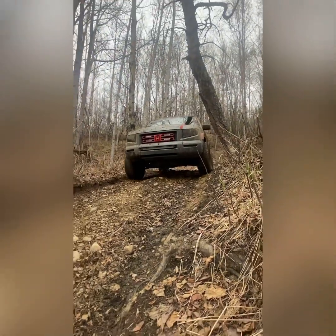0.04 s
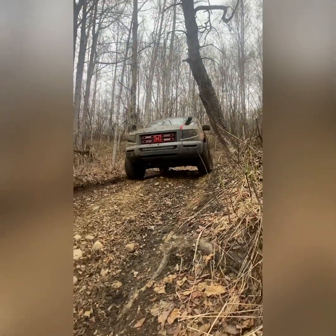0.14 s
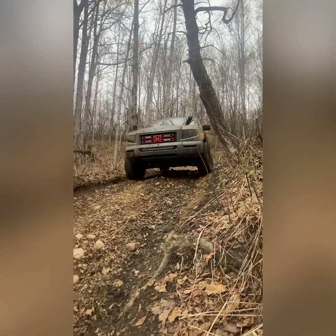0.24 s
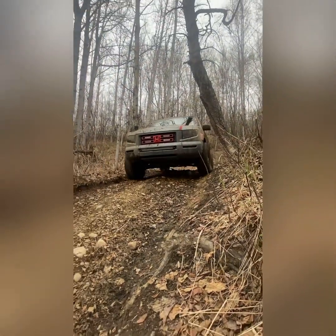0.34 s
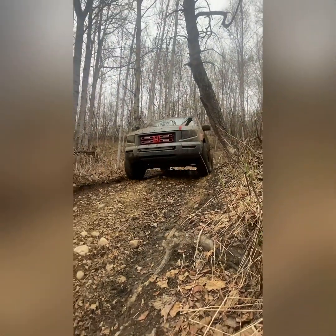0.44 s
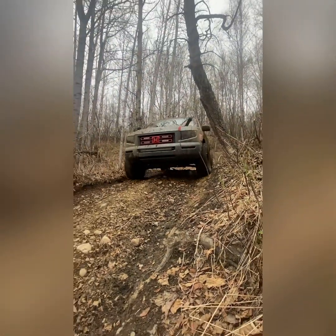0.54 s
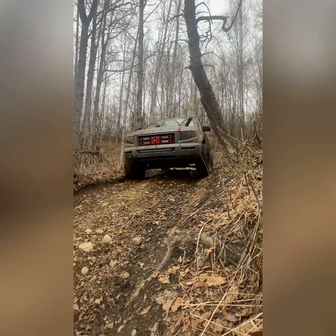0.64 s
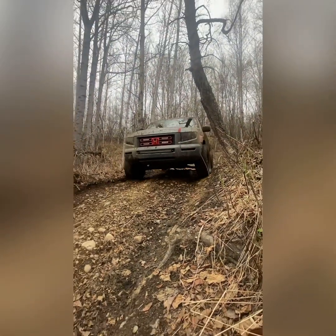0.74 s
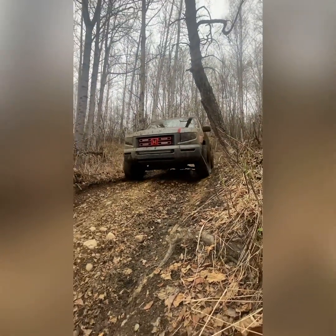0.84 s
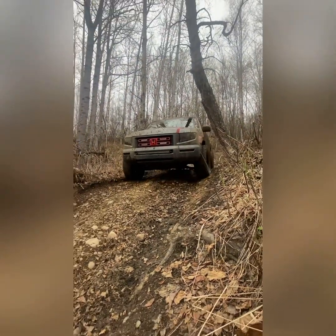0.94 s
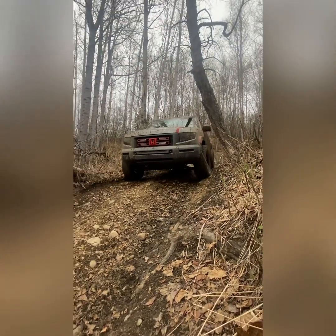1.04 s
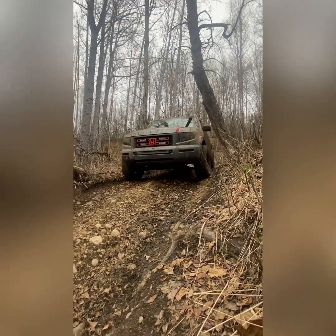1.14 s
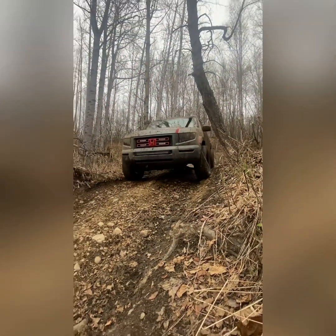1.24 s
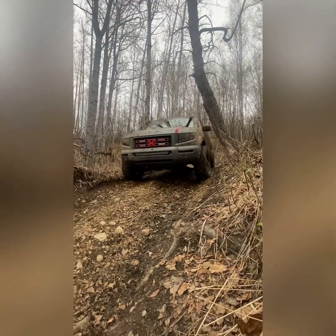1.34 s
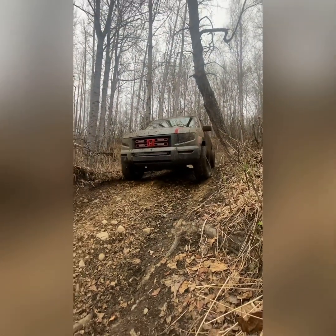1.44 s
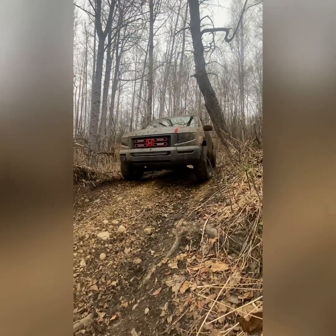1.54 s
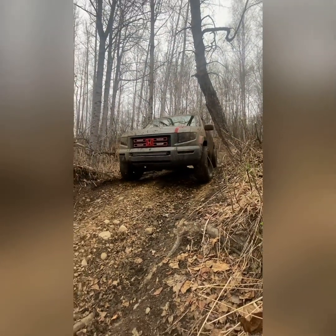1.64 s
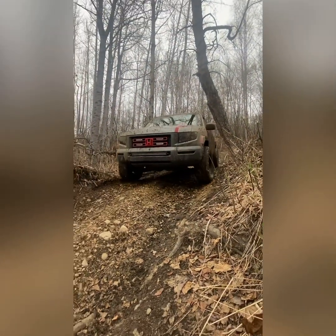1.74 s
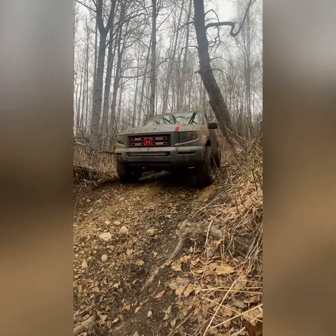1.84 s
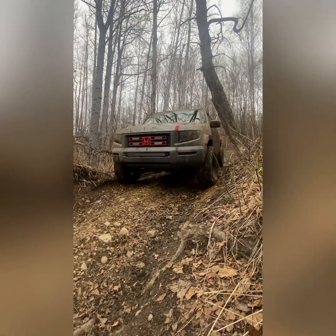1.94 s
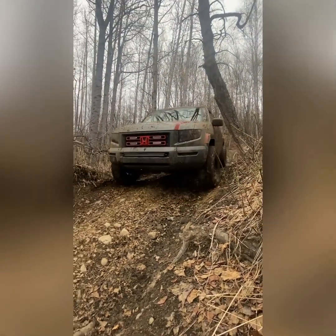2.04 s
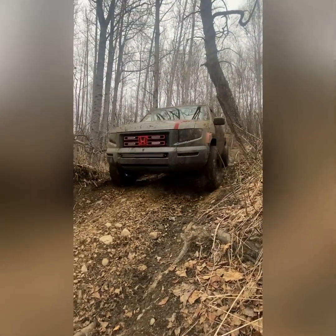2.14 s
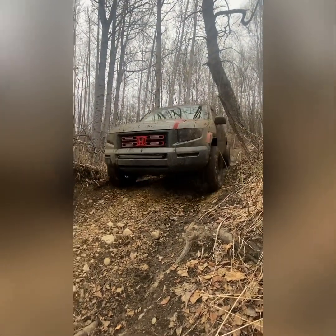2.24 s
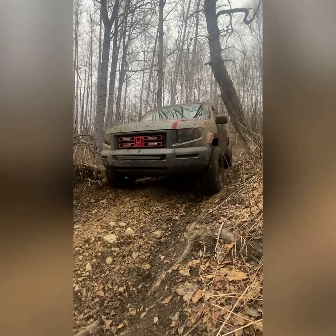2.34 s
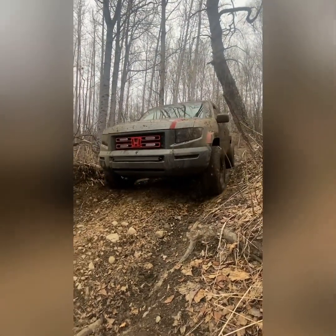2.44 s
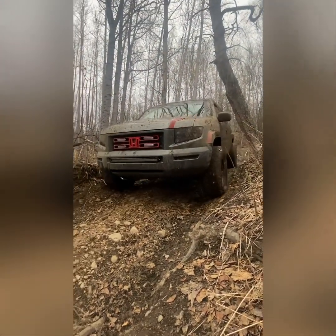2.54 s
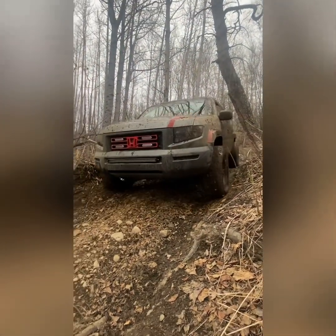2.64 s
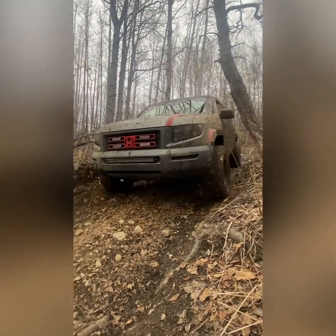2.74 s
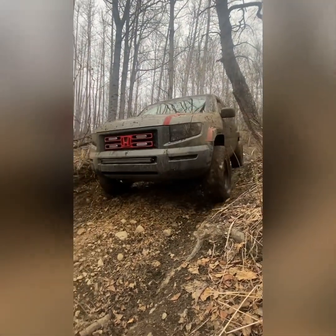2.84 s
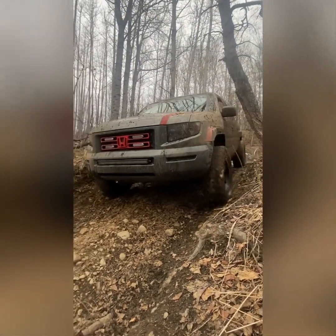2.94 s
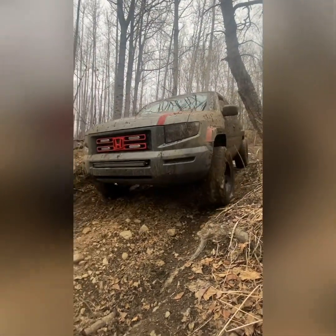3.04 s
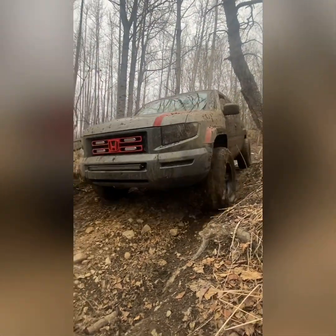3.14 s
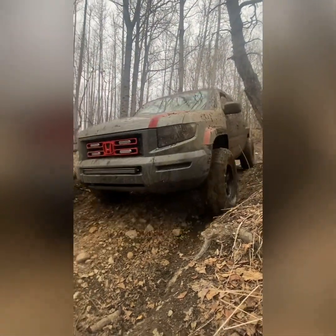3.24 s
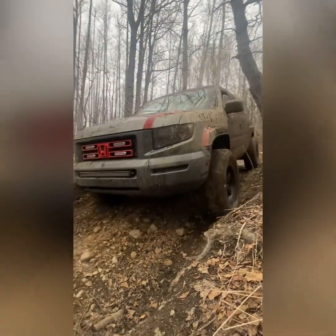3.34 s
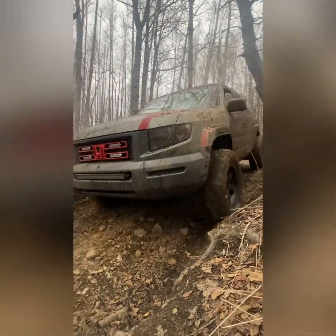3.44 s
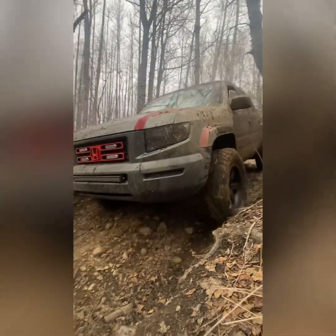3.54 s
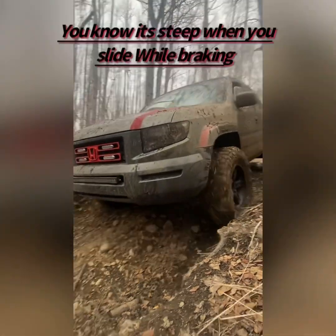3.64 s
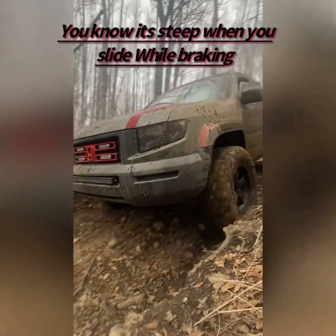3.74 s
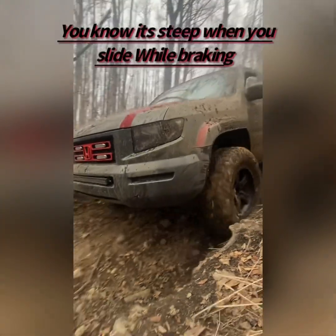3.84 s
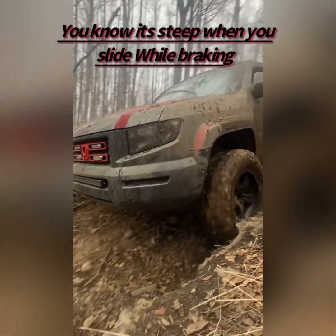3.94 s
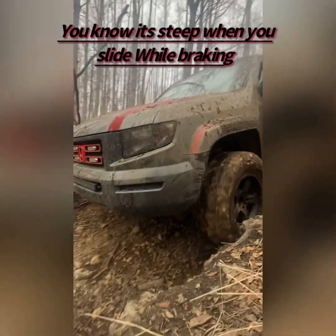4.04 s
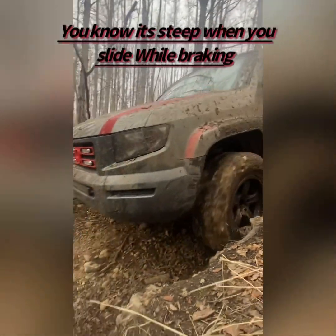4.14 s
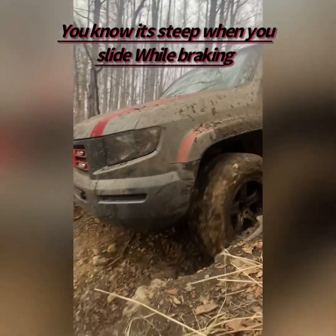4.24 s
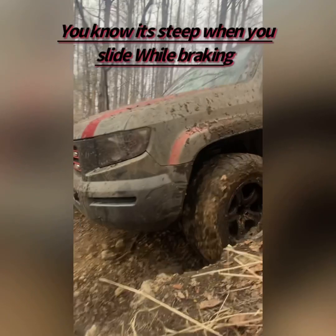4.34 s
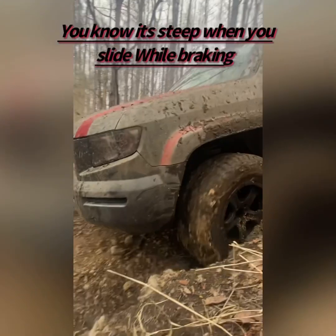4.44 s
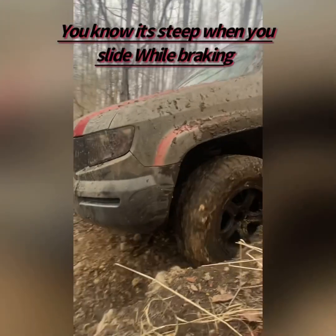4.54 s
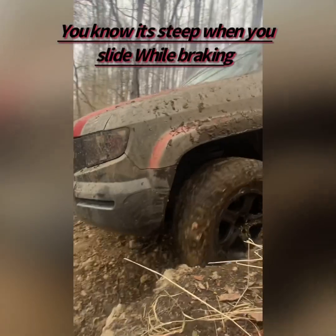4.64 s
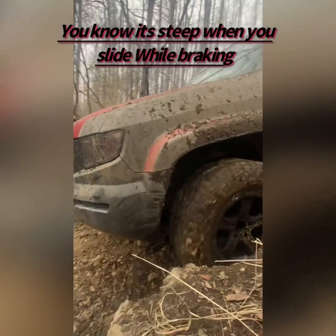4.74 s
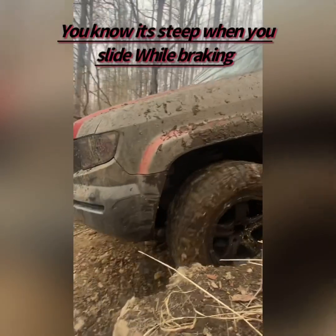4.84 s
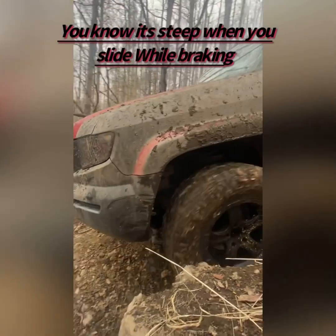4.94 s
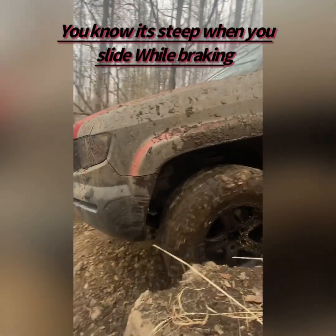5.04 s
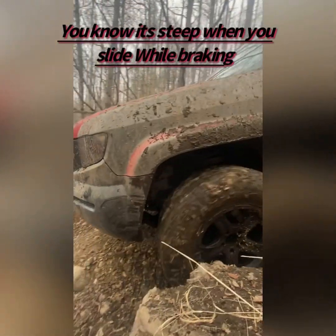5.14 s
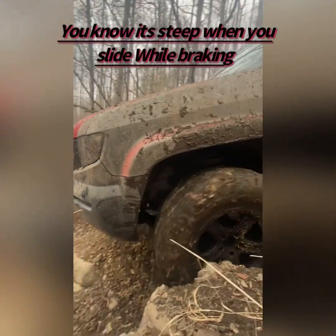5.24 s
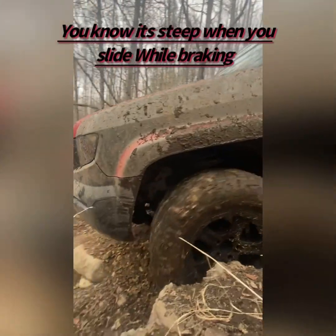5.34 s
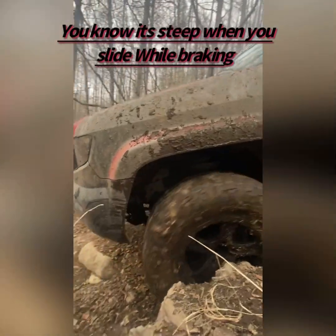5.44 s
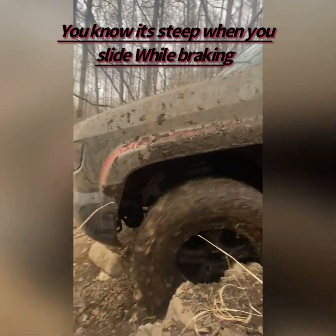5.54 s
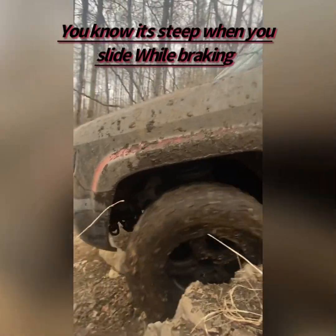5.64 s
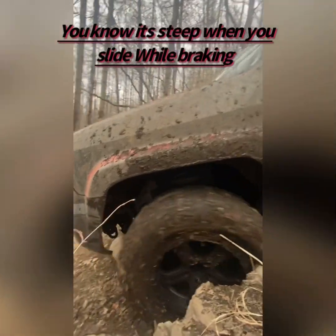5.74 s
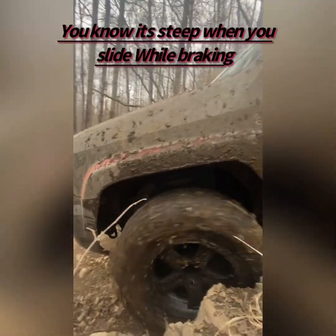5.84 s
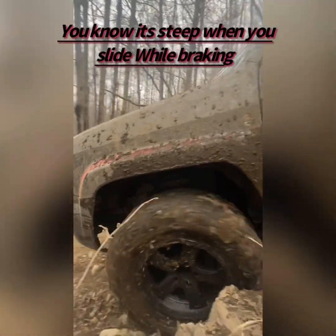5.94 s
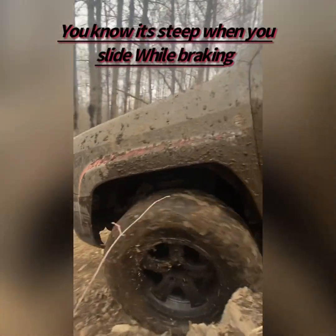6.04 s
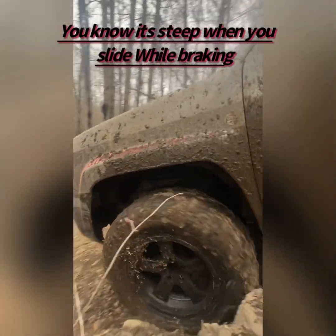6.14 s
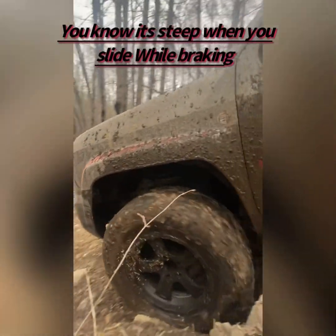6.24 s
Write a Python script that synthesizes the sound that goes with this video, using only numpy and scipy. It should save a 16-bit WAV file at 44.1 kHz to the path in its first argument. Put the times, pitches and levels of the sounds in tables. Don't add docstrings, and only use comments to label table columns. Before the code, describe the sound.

A pickup crawls down a steep dirt trail in a bare wood, heard by a phone close to the ground. From 0 to 2 s its idle is a moderate, smooth low hum near 70 Hz, with drumming panels, airy fan and intake rush and faint gritty tyre hiss. Around 2.1-2.5 s small knocks and twig ticks come as the engine briefly lifts in pitch and the hum swells clearly. It grows fuller until about 4.8 s, sagging slightly in pitch near 4.4 s, while the hollow rush shifts colour. A woody crack lands at 3.95 s with crushed leaves, then bright ticks to 4.4 s, a snap at 4.5 s and a cluster at 5.2 s. The wheel grinds alongside from 5.5 s; the strongest, hollow crack hits at 5.67 s. Dull soil crunches follow around 6.1 s, the engine still humming at the end.

```python
import sys
import numpy as np
from scipy import signal
from scipy.fft import rfft, irfft, next_fast_len
from scipy.io import wavfile
from scipy.ndimage import uniform_filter1d, map_coordinates

SR = 44100
rng = np.random.default_rng(int(sys.argv[2]) if len(sys.argv) > 2 else 0)


def to_linear_factor(level_db):
    exponent = np.asarray(level_db, float) / 20
    return 10 ** exponent


def materialize(psi):
    bounded = np.clip(np.atleast_2d(psi).T, -1, 1)
    quanta = np.round(bounded * 32767).astype(np.int16)
    wavfile.write(sys.argv[1], SR, quanta)


N = 277830
TIME = np.arange(N) / SR
SIZE = next_fast_len(N)
HZ = np.maximum(np.arange(SIZE // 2 + 1) * SR / SIZE, 1)


def columns(table):
    s, *rest = np.transpose(table)
    return [np.interp(TIME, s, c) for c in rest]


def on_bins(table):
    hz, *rest = np.transpose(table)
    return [np.interp(np.log(HZ), np.log(hz), c) for c in rest]


def unit(x):
    return x / np.sqrt(np.mean(x ** 2))


def colour(x, table):
    gain = to_linear_factor(on_bins(table)[0])
    return unit(irfft(rfft(x, SIZE) * gain, SIZE)[..., :N])


def ring(x, hz, width_hz):
    return signal.lfilter(*signal.iirpeak(hz, hz / width_hz, fs=SR), x)


def steep(x, hz, width_hz):
    return ring(ring(x, hz, 1.2 * width_hz), hz, 1.2 * width_hz)


def walk(rate):
    hold = int(SR / rate)
    steps = np.repeat(rng.standard_normal(N // hold + 1), hold)
    return 1.3 * uniform_filter1d(uniform_filter1d(steps, hold), hold)[:N]


def air():
    return rng.standard_normal((2, N))


def exhaust(turn, second_db, third_db):
    # multiple of the firing rate [ratio], level [level/dB]
    weak_orders = [(4 / 3, -47.5), (5 / 3, -45.5), (7 / 3, -41.5), (8 / 3, -38.5), (10 / 3, -42), (4, -40),
                   (5, -43), (17 / 3, -63), (6, -44.5), (19 / 3, -52), (20 / 3, -54.5), (7, -45)]
    third_lag = 1.83
    weak = sum(to_linear_factor(db + 1.6 * walk(7)) * np.sin(k * turn + .25 * walk(6) + k) for k, db in weak_orders)
    second = to_linear_factor(second_db + 0.5 * walk(16)) * np.sin(2 * turn)
    third = to_linear_factor(third_db + .9 * walk(12)) * np.sin(3 * turn + third_lag + .4 * walk(1.3))
    return np.sqrt(2) * (second + third + to_linear_factor(0.76 * second_db + 5.5) * weak)


def panels(turn, third_db):
    # [f/Hz, level/dB]
    drum_spectrum = [(20, -26), (40, -21), (110, 3.5), (160, -4.5), (210, -3), (270, -11), (360, -2.5),
                     (470, -12.5), (700, -37)]
    drum_db = -48 + 0.71 * (third_db - third_db.max())
    beat = 1 + 0.21 * np.cos(turn + 0.64)
    return to_linear_factor(drum_db - 0.15 + 0.48 * walk(11)) * beat * colour(air(), drum_spectrum)


def hollow(start, end, from_hz, to_hz, width_hz):
    fade_s = .15
    span = slice(int(max(start - fade_s, 0) * SR), int((end + fade_s) * SR))
    time = TIME[span]
    facing = np.clip(np.minimum(time - start + fade_s, end - time + fade_s) / (2 * fade_s), 0, 1)
    centre = np.interp(time, [start, end], [from_hz, to_hz]) * (1 + .012 * walk(5)[span])
    angle = 2 * np.pi * np.cumsum(centre) / SR
    slow = signal.butter(2, width_hz / SR, output="sos")
    along = signal.sosfilt(slow, rng.standard_normal(len(time)))
    across = signal.sosfilt(slow, rng.standard_normal(len(time)))
    whoosh = unit(along * np.cos(angle) + across * np.sin(angle))
    return span, facing * to_linear_factor(1.3 * walk(8)[span]) * whoosh


def engine_bay(turn, bay_db):
    # [f/Hz, level/dB per Hz]
    rush_spectrum = [(300, -8), (450, -4), (620, -1.5), (900, -1), (1300, -5.5), (1800, -10), (2500, -20.5),
                     (3600, -31.5), (5000, -55)]
    # [from t/s, to t/s, f/Hz, level/dB over the bay]
    bonnet_hollows = [(0, 3.3, 605, -18.5), (.5, 3.3, 810, -11.5), (2.3, 3.7, 825, -10.5),
                      (.9, 1.6, 1045, -13), (0, 0.43, 1155, -11.5), (2.95, 3.25, 1150, -10.5),
                      (3.4, 4.6, 1000, -20), (2.6, 3.2, 1795, -17), (-0.5, 2.3, 3740, -27.5),
                      (5.38, 5.55, 1050, -11), (0, .6, 1875, -14), (1.7, 3.6, 2000, -19), (0, .7, 490, -18),
                      (4.3, 5.3, 1000, -13), (3.9, 5.1, 760, -9.5), (3.3, 3.2, 830, -14),
                      (3.6, 4.3, 2020, -18.5), (0, .9, 1400, -16.5), (5.5, 5.9, 760, -10)]
    # [from t/s, to t/s, f/Hz, level/dB over the bay]
    grille_whistles = [(1.7, 2.4, 1378, -16), (2.4, 3.0, 1040, -11.5), (3.4, 4.0, 1320, -17),
                       (3.65, 4.1, 1425, -12), (2.8, 4.2, 341, -17), (0, 2.0, 3000, -27),
                       (0, 3.9, 12500, -43), (0, 2.1, 173, -24)]
    # [from t/s, to t/s, f/Hz, level/dB over the bay]
    arch_booms = [
        (2.3, 4.6, 234.9, -14),
        (4.8, 5.9, 465, -10),
        (4.95, 6.3, 239.8, -6),
    ]
    rush = to_linear_factor(1.43 * walk(16)) * (1 + 0.047 * np.cos(turn)) * colour(air(), rush_spectrum)
    for table, width, rise in ((bonnet_hollows, .065, .025), (grille_whistles, .028, .012),
                               (arch_booms, .45, -.03)):
        for start, end, hz, db in table:
            slide = rise * hz * (end - start) / 2
            span, whoosh = hollow(start, end, hz - slide, hz + slide, width * hz)
            rush[:, span] += to_linear_factor(db + 4.5) * whoosh
    return to_linear_factor(bay_db + 0.74) * rush


def grit(rate, spread_db, smear_s):
    grains = (rng.random(N) < rate / SR) * to_linear_factor(spread_db * rng.exponential(size=N))
    return unit(signal.lfilter([1], [1, -np.exp(-1 / (smear_s * SR))], grains))


def tread(bay_db):
    # [f/Hz, level/dB]
    soil_spectrum = [(1500, -19), (2500, -1.5), (3500, -2.5), (4500, -9), (5800, -5), (7500, -11),
                     (10000, -16.5), (12300, -25.5), (13500, -34), (16000, -40)]
    wheel_s, wheel_rise_s, wheel_db = 5.5, .2, 1.5
    wheel = 1 / (1 + np.exp((wheel_s - TIME) / (wheel_rise_s / 4)))
    grind_db = -58 + 0.95 * (bay_db - bay_db.max()) + wheel_db * wheel
    gritty = 1 + .3 * grit(rate=250, spread_db=2.6, smear_s=.003)
    return to_linear_factor(grind_db + 2.5 + 1.34 * walk(8)) * colour(air() * gritty, soil_spectrum)


def litter():
    # [from t/s, length/s, level/dB, f/Hz]
    crushes = [(1.27, .06, -66, 8300), (3.906, .05, -51, 3300), (3.912, 0.043, -39, 700),
               (3.911, .045, -44.5, 1450), (4.224, .04, -55.5, 6000), (4.576, .057, -64, 9500),
               (5.497, .08, -60.5, 10900), (5.424, 0.051, -45, 980), (5.735, .05, -63.5, 8950),
               (5.812, 0.027, -57.5, 6000), (5.923, 0.024, -51.5, 5300), (6.071, 0.082, -51.5, 2770),
               (6.088, .055, -36.5, 630), (6.153, 0.047, -55.5, 5170), (6.229, 0.057, -50, 2760),
               (6.234, 0.087, -61, 6000), (6.08, .2, -45, 240)]
    out = np.zeros((2, N))
    rough = .7 + .6 * grit(rate=400, spread_db=2.6, smear_s=.002)
    for start, length, db, hz in crushes:
        at = int(start * SR)
        size = min(int(length * SR), N - at)
        burst = unit(steep(rng.standard_normal((2, 9000)), hz, 0.66 * hz))[:, :size]
        swell = np.sin(np.pi * np.arange(size) / size) ** 0.22
        out[:, at:at + size] += to_linear_factor(db) * burst * rough[at:at + size] * swell
    return out


def snaps():
    # [t/s, peak level/dB, f/Hz]
    twigs = [(2.004, -53, 6000), (2.319, -54, 7950), (3.023, -52, 6910), (3.704, -51.5, 4950),
             (3.83, -57, 9100), (4.1201, -43, 6440), (4.228, -67, 9950), (4.3266, -50.5, 5600),
             (4.401, -41.5, 6500), (4.871, -51.5, 6000), (5.456, -50.5, 10800), (6.126, -44, 6000)]
    # [t/s, peak level/dB, f/Hz, ring/s]
    sticks = [(2.139, -38.5, 600, 0.027), (2.33, -40, 2600, 0.11), (2.329, -45, 7900, .055),
              (2.415, -39, 495, .07), (3.27, -40, 510, 0.033), (3.957, -28, 593, 0.1),
              (3.957, -36.5, 1420, 0.028), (4.522, -34, 900, 0.049), (4.523, -35, 2250, 0.099),
              (5.187, -33.5, 1110, 0.049), (5.187, -40, 350, 0.034), (5.211, -40, 700, .04),
              (5.263, -37.5, 985, .015), (5.666, -29.5, 1030, 0.041), (5.669, -25, 730, 0.11),
              (5.667, -54, 2800, .025), (5.79, -47, 2760, 0.033)]
    out = np.zeros((2, N))
    after = np.arange(4000) / SR
    breaks = [(*row, 0.015, 0.31) for row in twigs] + [(*row, 0.49) for row in sticks]
    for start, db, hz, ring_s, width in breaks:
        at, width_hz = int(start * SR), width * hz
        splinter = rng.standard_normal((2, 4000)) * np.exp(-np.log(1000) * after / ring_s)
        push = np.hanning(3 + int(.5 * SR / hz))
        splinter[:, :len(push)] += 2.56 * np.sqrt(SR / width_hz) * push / push.sum()
        splinter[:, :len(push)] *= np.sqrt(np.cumsum(push) / push.sum())
        crack = steep(splinter, hz, width_hz)
        out[:, at:at + 4000] += to_linear_factor(db + 8.5) * crack / np.abs(crack).max(axis=1, keepdims=True)
    return out


def ground_echo(x):
    echo_s, shrink, echo_db = 0.004313, .012, -10
    delay = echo_s * (1 - shrink * TIME) * (1 + 0.013 * walk(1.95))
    place = (TIME - delay) * SR
    echo = np.array([map_coordinates(v, [place], order=1, mode="mirror") for v in x])
    return x - to_linear_factor(echo_db) * echo


def ports(direct, scattered):
    # [f/Hz, left minus right level/dB, extra left lead/rad, likeness/0-1]
    port_differences = [(60, 0.2, -0.156, 0.99), (140, -1.5, -0.26, 0.95), (257, -3, -0.38, 0.91),
                        (393, -1, 0.68, 0.83), (510, 2, 1.19, 0.96), (957, 7.5, 0.57, 0.85),
                        (1490, 9, -0.56, 0.94), (1770, 2.5, -0.95, 0.49), (2600, .5, -0.53, 0.78),
                        (3290, -1, -1.13, 0.75), (4040, -0.5, 0.19, 0), (6000, 0, 0.26, 0.36),
                        (7640, 0, 1.2, 0.86), (10500, 0, -0.26, 0.74)]
    lag_s = .000187
    direct, scattered = rfft(direct, SIZE), rfft(scattered, SIZE)
    balance_db, lead, like = on_bins(port_differences)
    like = np.clip(like, 0, 1)
    tilt = to_linear_factor(balance_db / 2) * np.exp(.5j * (lead + 2 * np.pi * HZ * lag_s))
    right = like * direct + np.sqrt(1 - like ** 2) * scattered
    return irfft(np.array([direct * tilt, right / tilt]), SIZE)[:, :N]


def scene():
    # [t/s, second order f/Hz, second order level/dB]
    exhaust_curve = [(0, 69.7, -31.7), (.55, 70.4, -32.8), (.85, 68.9, -32.1), (1.6, 69.4, -32.2),
                     (2.05, 68.2, -30.7), (2.17, 66.9, -30.3), (2.27, 68.1, -26.9), (2.36, 72.6, -25.5),
                     (2.46, 71.3, -23.4), (2.6, 70.2, -23.1), (2.95, 71.8, -22.7), (3.45, 69.4, -21.9),
                     (3.95, 67.1, -21.1), (4.4, 64.3, -20.4), (4.8, 64.4, -19.9), (5.45, 67.7, -21.1),
                     (5.8, 66.3, -21.6), (6.3, 66.3, -21.3)]
    # [t/s, engine bay level/dB]
    nearness = [(0.0, -46), (1.16, -46), (1.63, -45.5), (2.93, -42.5), (3.14, -42), (3.84, -41.5),
                (4.23, -42), (5.23, -44.5), (5.35, -43), (6.3, -44)]
    second_hz, second_db = columns(exhaust_curve)
    bay_db, = columns(nearness)
    pipe_hz = 104.03
    third_db = second_db - 9 - 1.25 * np.maximum(pipe_hz - 3 * second_hz / 2, 0)
    turn = np.pi * np.cumsum(second_hz) / SR + .7
    engine = ground_echo(panels(turn, third_db) + engine_bay(turn, bay_db))
    tyres = tread(bay_db) + litter() + snaps()
    direct, scattered = engine + tyres
    return ports(direct + exhaust(turn, second_db, third_db), scattered)


def low_pass(x):
    return signal.sosfilt(signal.butter(12, 15760, fs=SR, output="sos"), x)


def record(dry):
    return low_pass(dry)


dry = scene()
out = record(dry)
materialize(out)
```